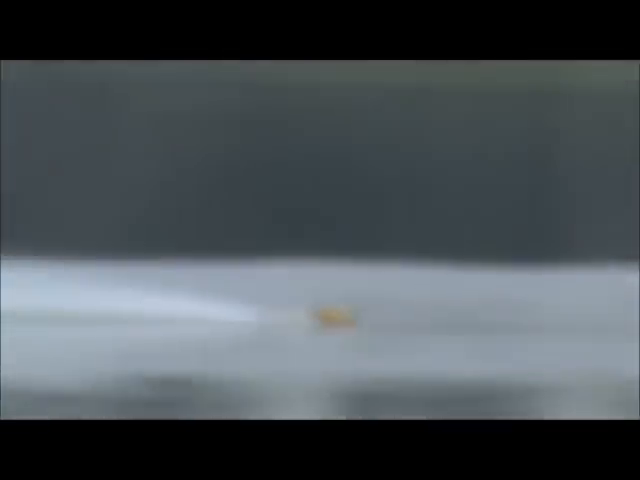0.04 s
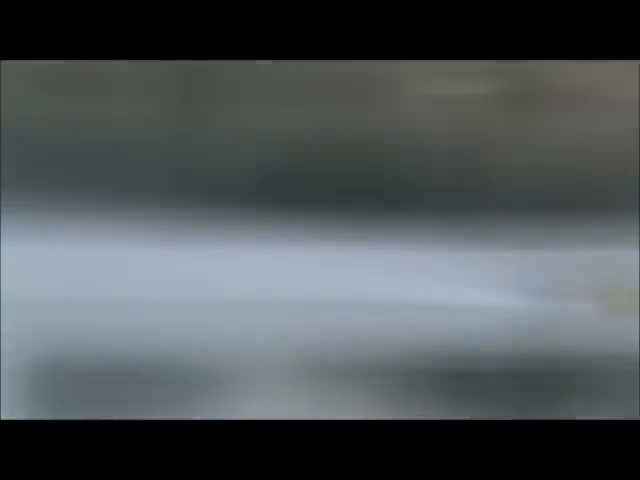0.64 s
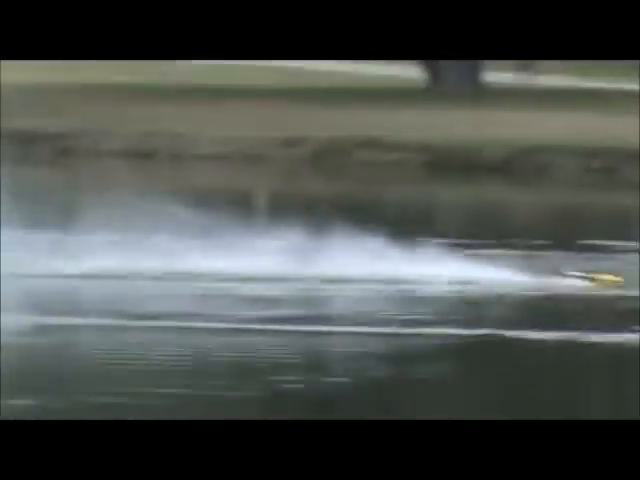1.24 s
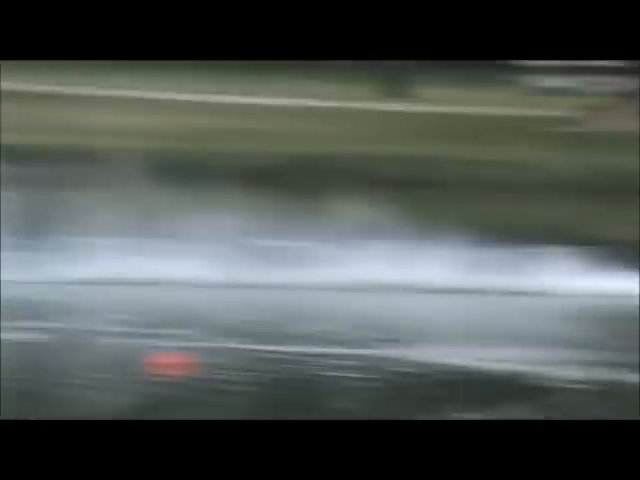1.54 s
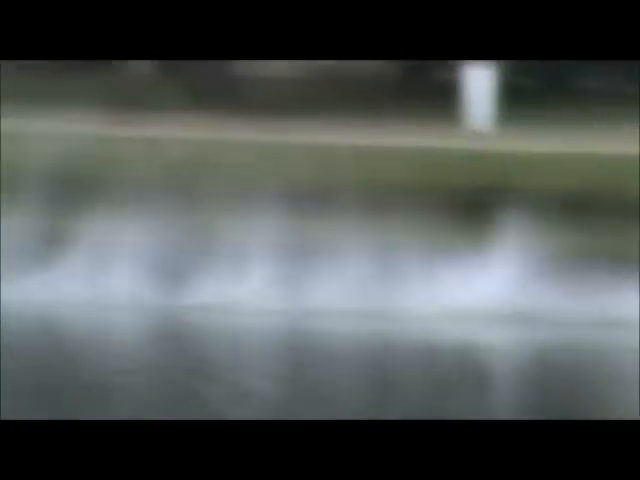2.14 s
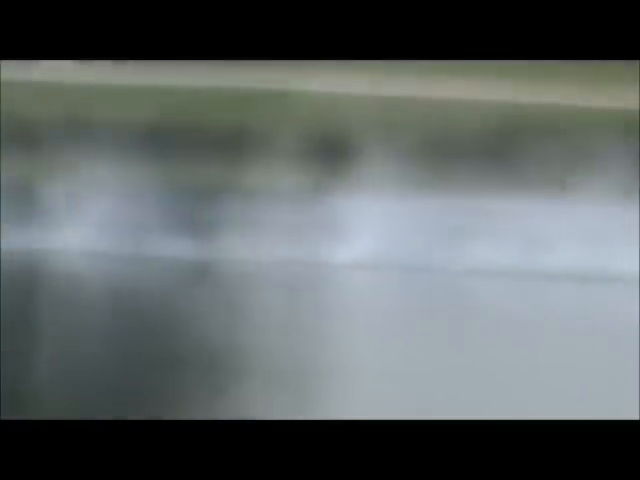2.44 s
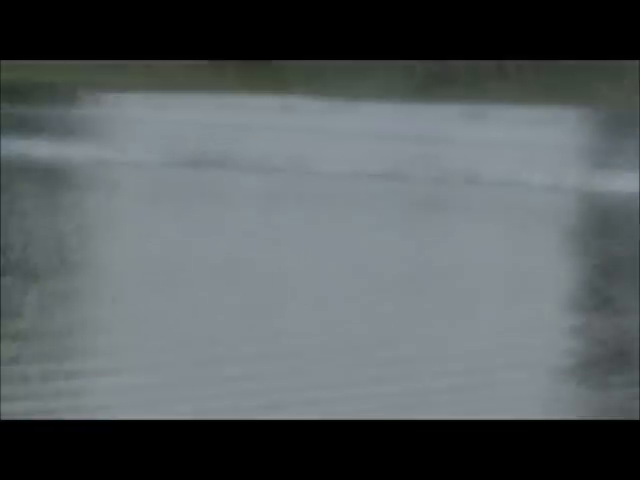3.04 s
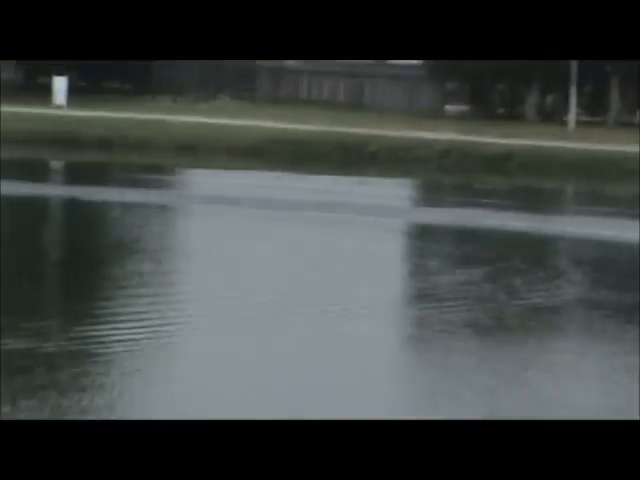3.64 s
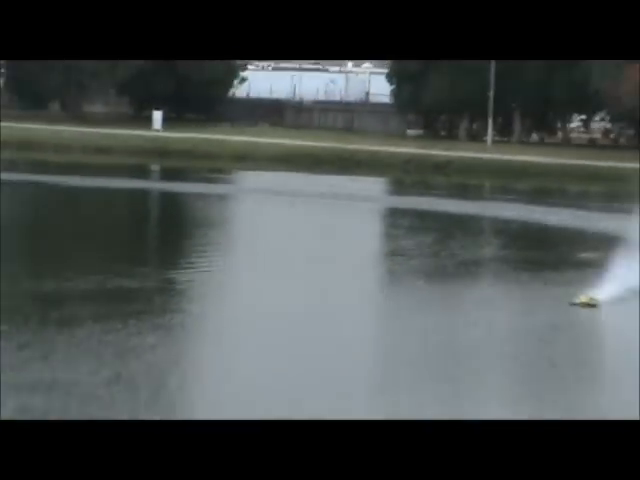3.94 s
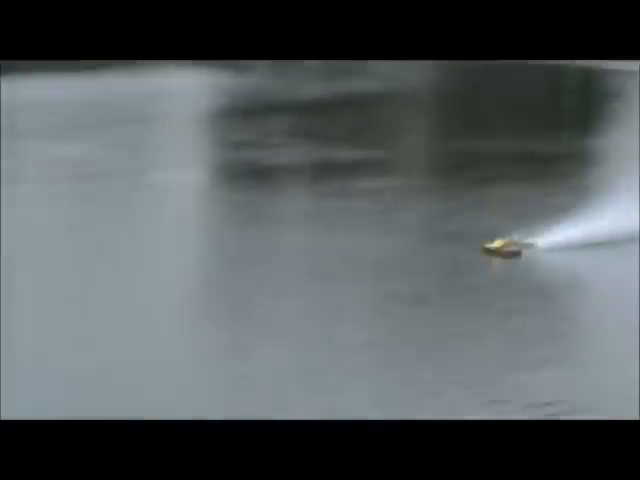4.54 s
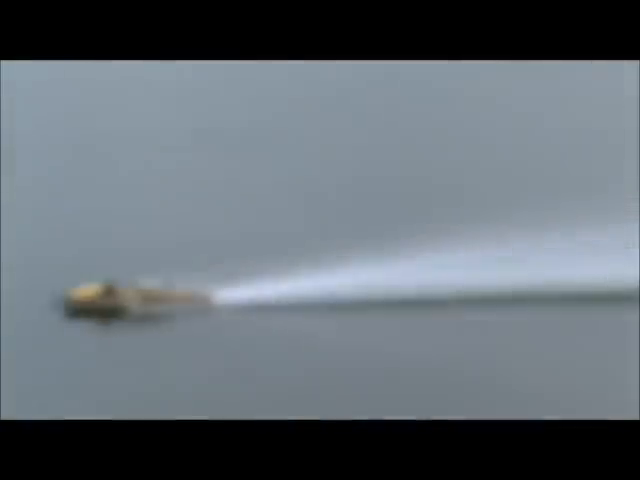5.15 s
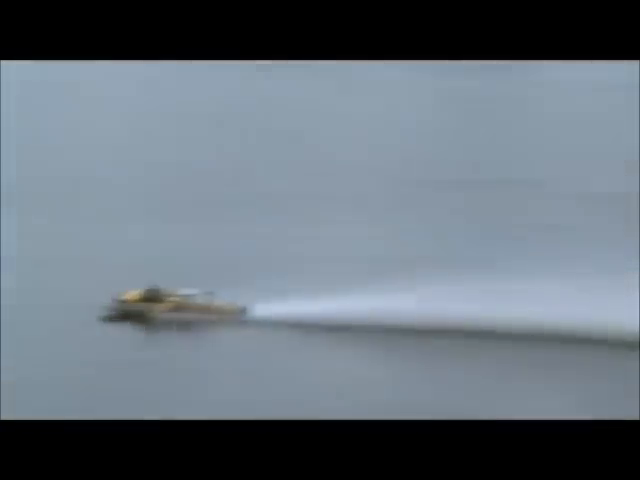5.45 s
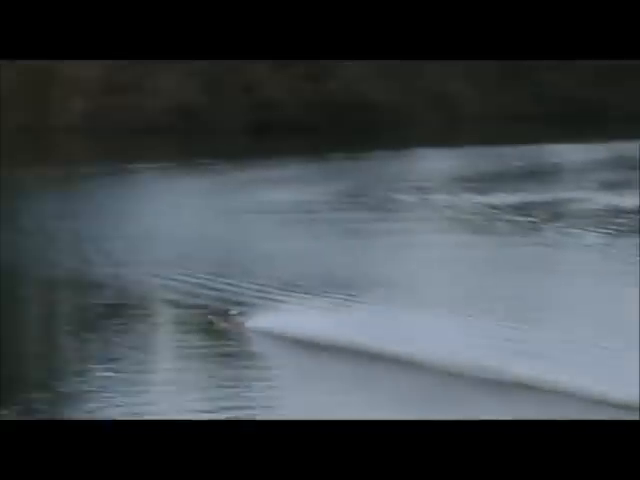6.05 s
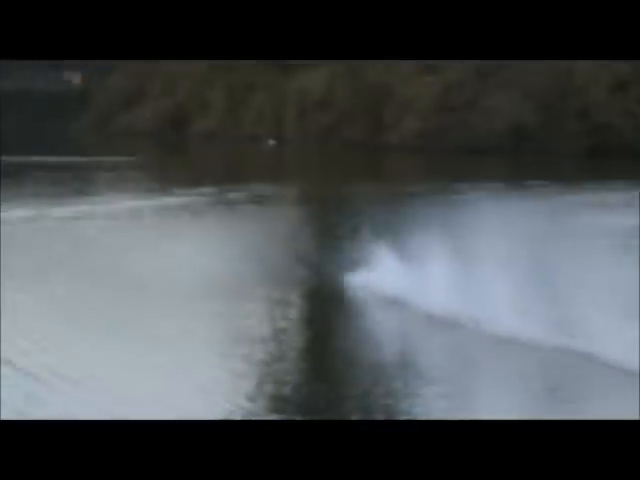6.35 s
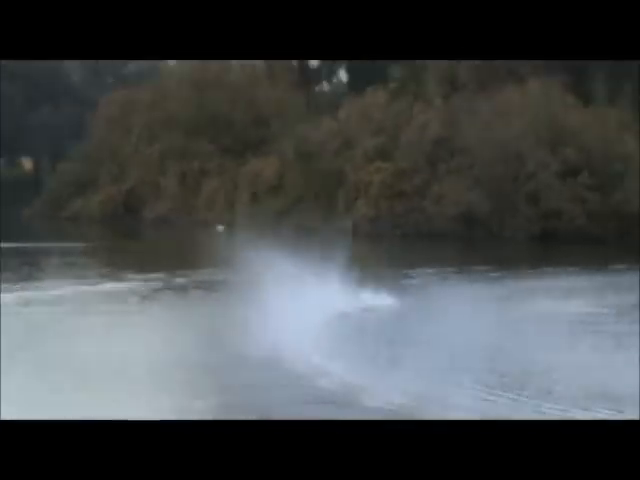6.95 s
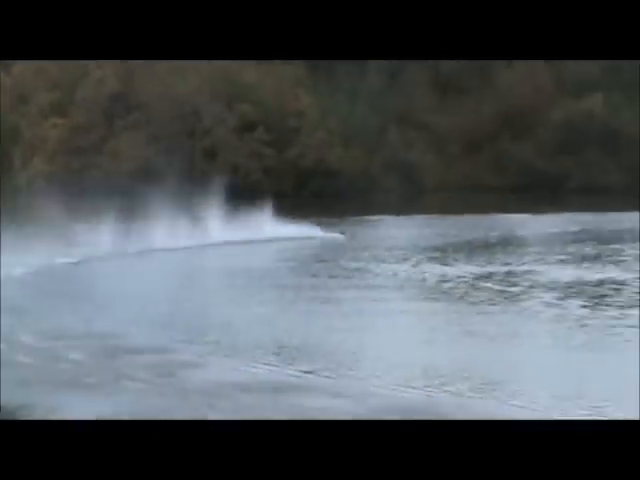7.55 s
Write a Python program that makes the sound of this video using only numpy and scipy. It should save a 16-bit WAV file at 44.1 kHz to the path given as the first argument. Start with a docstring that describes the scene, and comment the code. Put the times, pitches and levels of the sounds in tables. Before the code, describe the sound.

Heard from the edge of a pond, a small model speedboat holds a high, raspy engine scream that wavers and leaps in quick blips. The pitch climbs a little on the approach, the exhaust and spray hiss as it goes by, and the note sinks as it heads away with more quick revs. Its wake churns softly underneath, and the wooded banks return a dull echo.

```python
"""First comes the hard, singing buzz of a model racing boat's two-stroke, flat out across a pond.
Heard from the bank on a close pair of microphones, it passes near at about 5.4 s and turns away.
The hull skips on the ripples: the engine races as the propeller lifts and sags as it bites.
The tuned pipe sings the low orders, the exhaust rasps and sizzles above them, and close up the drive whines.
Behind it the wake churns, the open air rumbles and the wooded banks answer."""
import sys
import numpy as np
from scipy import signal
from scipy.fft import rfft, irfft, next_fast_len
from scipy.io import wavfile
from scipy.ndimage import uniform_filter1d, minimum_filter1d, map_coordinates

SR = 44100
rng = np.random.default_rng(int(sys.argv[2]) if len(sys.argv) > 2 else 0)


def bounce(signal):
    """Save signal as a 16-bit WAV file at the path given by the first command-line argument."""
    frames = np.transpose(np.atleast_2d(signal))
    limited = np.clip(frames, -1, 1)
    pcm = np.round(limited * 32767).astype(np.int16)
    wavfile.write(sys.argv[1], SR, pcm)


N = 343539

# firing rate with the propeller gripping: up on the approach, down in the pass and the turn: t/s, f/Hz
CRUISE_RATE = [(0.0, 309), (0.98, 303.2), (1.56, 307), (2.36, 307.4), (2.83, 311.6), (3.52, 306.2),
               (3.64, 317.5), (4.5, 332.5), (4.79, 332), (5.14, 323.4), (5.7, 287.6), (6.01, 281.4),
               (6.86, 275.5), (7.19, 277.7), (7.79, 264.5)]
# spells of even rocking: first crest/s, last crest/s, period/s, first swing/Hz, last swing/Hz
ROCKING_SPELLS = [(0.023, 0.27, 0.0814, 4.3, 6.6), (1.468, 2.03, 0.0813, 9.7, 14.4),
                  (2.665, 2.9, 0.0784, 10.2, 12.8), (3.734, 4.89, 0.0902, 6.7, 5.3),
                  (5.8977, 6.63, 0.0997, 0.4, 15.7)]
# leaps that lift the propeller clear: take-off/s, time in the air/s, pull on the firing rate/Hz
HULL_LEAPS = [(2.11, 0.05, 32), (2.209, 0.051, 57.5), (2.463, 0.056, 55), (2.585, 0.036, 31.7),
              (2.971, 0.04, 19), (3.072, 0.053, 79), (3.193, 0.08, 7.97), (3.437, 0.026, 65),
              (6.775, 0.024, 55), (6.879, 0.041, 42), (7.009, 0.068, 42), (7.153, 0.099, 54),
              (7.326, 0.101, 55.6), (7.497, 0.087, 54), (7.656, 0.049, 50)]
# resonances of the tuned pipe: f/Hz, level/dB
PIPE_RESONANCES = [(240, -9.5), (290, -10), (340, -8.5), (500, -13.5), (580, -4.5), (655, 1), (760, -1.5),
                   (900, -9.5), (1100, -0.5), (1240, -6), (1350, -9.5), (1480, -18)]
# the pipe's first four orders as heading and distance change: t/s, relative level/dB
ORDER_1 = [(0.0, -14.5), (0.89, -15), (1.06, -10), (1.32, -14.3), (2.06, -10.5), (2.23, -17), (3.57, -13),
           (3.89, -18.5), (4.24, -14.5), (4.65, -17), (5.69, -7), (6.16, -14), (6.9, -14), (7.55, -21),
           (7.79, -17)]
ORDER_2 = [(0.0, -11.5), (0.36, -17.5), (2.15, -11.5), (2.59, -15), (3.21, -11.5), (3.32, -9),
           (4.24, -10.5), (4.56, -14.5), (5.15, -12.5), (5.29, -19.5), (5.76, -14), (5.88, -22.5),
           (7.08, -18.5), (7.4, -11), (7.79, -14.0)]
ORDER_3 = [(0.0, -13.4), (0.92, -14.4), (1.0, -20.5), (1.11, -13), (3.17, -14.5), (3.28, -11.5),
           (5.25, -15.0), (5.54, -11), (6.1, -18.5), (6.42, -17), (7.01, -20.5), (7.21, -14.6), (7.79, -14)]
ORDER_4 = [(0.0, -9.5), (2.33, -13.5), (2.89, -9), (3.15, -18), (3.71, -11.5), (4.09, -14), (4.68, -10),
           (5.09, -15.5), (5.29, -8), (5.4, -29.5), (5.48, -10), (5.74, -21.8), (5.88, -18.5),
           (6.14, -19.5), (6.36, -14.5), (7.37, -21.5), (7.79, -16)]
# roughness of the ride, which sets the exhaust's share of turbulent gas and spray: t/s, share/0-1
ROUGHNESS = [(0, 0.18), (.5, 0.08), (1.35, 0.1), (1.6, 0.28), (3.3, 0.42), (4.6, 0.38), (5.4, 0.33),
             (5.8, 0.11), (6.5, 0.07), (6.75, 0.32), (7.1, 0.18), (7.79, 0.22)]
# the rasp, strongest with the boat pointing at the shore or away from it: t/s, relative level/dB
RASP_LEVEL = [(0.0, -19), (0.45, -16.5), (0.8, -14.5), (0.95, -12.5), (1.35, -19), (1.6, -22), (2.25, -22),
              (2.85, -19), (3.1, -19), (3.25, -21.5), (4.1, -23), (4.55, -18.7), (5.55, -21), (6.1, -12),
              (6.4, -15.5), (6.78, -30), (7.25, -20), (7.79, -23)]
# the exhaust's two top bands, strongest close to the microphones: t/s, edge/dB, sizzle/dB (both relative)
TOP_LEVELS = [(0.0, -26, -44.5), (0.42, -29, -44), (0.65, -34, -50), (1.15, -28.5, -44),
              (1.75, -33.1, -50.5), (2.6, -30.5, -46.5), (3.1, -29.5, -43.5), (3.9, -32.0, -42),
              (4.5, -28.9, -34), (5.2, -28.5, -28.2), (5.38, -22, -21.5), (5.56, -25, -25),
              (5.75, -24, -23), (6.15, -29.5, -26), (6.75, -33.8, -42.5), (7.15, -37, -43.5),
              (7.55, -33.5, -44.5), (7.79, -29.5, -46.5)]
# colour of the exhaust from ahead, abeam and astern: f/Hz, level/dB
FROM_AHEAD = [(1250, -59), (1520, -23), (1830, -8.5), (2130, -1.5), (2440, -0.5), (2750, -11), (3050, -9.5),
              (3350, -16), (3660, -4), (3950, -16.5), (4550, -5), (4900, -16.5), (5800, -18), (7000, -29.5)]
FROM_ABEAM = [(1250, -41), (1550, -5.5), (1950, 1.5), (2300, -4), (2650, 0.5), (2950, -5.5), (3350, -2.5),
              (3950, -9), (4700, -6), (5600, -8.5), (7000, -20.5)]
FROM_ASTERN = [(1150, -60), (1400, -12), (1700, -1), (2000, 3.5), (2280, 4), (2550, -1), (2850, -2),
               (3150, -14), (3450, -9.5), (3900, -21.5), (5600, -22), (7000, -35)]
# colour of the exhaust's top band: f/Hz, level/dB
SIZZLE_COLOUR = [(5500, -19), (6900, -7.5), (8400, 2), (9600, -3), (10800, -12), (11800, -30.5),
                 (14000, -47)]
# spray hiss, which carries only a short distance: f/Hz, level/dB
SPRAY_COLOUR = [(8000, -33), (10500, 2.5), (12000, -8.5), (15000, -21), (16500, -56)]
# how squarely the spray stands between pipe and shore: t/s, share/0-1
SPRAY_SCREEN = [(5.7, .2), (6.1, 0.99), (6.6, 0.76), (7.0, .25)]
# echo of the wooded banks: f/Hz, time to fall 60 dB/s
BANK_DECAY = [(200, 1), (1000, 0.62), (3000, 1), (10000, 0.15)]
# churning water behind the hull, and the rumble of the open air: f/Hz, level/dB
WASH_COLOUR = [(100, -54), (250, -2), (420, -8), (650, 1), (1150, 2), (1450, -3), (1900, -1), (3000, -66)]
AIR_COLOUR = [(15, -19), (30, -6.5), (50, -3.5), (75, 3.5), (110, -0.5), (190, 0), (300, -42), (600, -32),
              (2000, -77)]
# the background at the water's edge: t/s, wash level/dB, air level/dB
BACKGROUND_LEVELS = [(0, -27.5, -41), (1.3, -27, -41), (2, -25, -39), (3.3, -24.5, -38.5),
                     (4.5, -27.5, -45), (5.5, -24.5, -49), (6.3, -28.5, -51.5), (6.9, -32, -47),
                     (7.79, -29, -44.5)]
# the boat drifts a little to either side of the microphones: t/s, left minus right/dB
BOAT_BEARING = [(0, 0.4), (1.2, -0.2), (2.5, -1), (3.5, -2), (4.7, -2), (5.5, -1), (6.5, 0.1), (7.79, 0.5)]
# colour of one capsule against the other: f/Hz, left minus right/dB
CAPSULE_BALANCE = [(60, 4), (170, 7), (300, 4.5), (640, 3.5), (1150, -0.4), (2300, -1.5), (4500, 0),
                   (9000, 0), (13000, -4.5)]
# stereo width of the pair: f/Hz, typical side minus mid/dB
PAIR_WIDTH = [(60, -13), (300, -20), (1200, -15), (4000, -15), (9000, -12), (13000, -5)]


def amp(db):
    """Decibels to gain."""
    return np.exp(np.asarray(db) * np.log(10) / 20)


def unit(x):
    """x at rms 1."""
    return x / np.sqrt(np.mean(x ** 2) + 1e-20)


def along(points, hz):
    """Read (f/Hz, value) points on a log axis."""
    f, v = np.transpose(points)
    return np.interp(np.log(hz + 1), np.log(f + 1), v)


def curves(rows):
    """One value per sample for each column after the time."""
    times, *columns = np.transpose(rows)
    return [np.interp(np.arange(N) / SR, times, column) for column in columns]


def wobble(rate):
    """A smooth random curve, rate knots a second."""
    knots = int(N * rate / SR) + 4
    fine = np.arange(knots * 8) / 8
    smooth = map_coordinates(rng.standard_normal(knots + 1), [fine])
    return np.interp(np.arange(N) * rate / SR, fine, smooth)


def filtered(x, response):
    """x through a complex frequency response."""
    m = next_fast_len(N + SR // 2)
    return irfft(rfft(x, m) * response(np.fft.rfftfreq(m, 1 / SR)), m)[..., :N]


def coloured(x, spectrum):
    """x shaped by a spectrum, at rms 1."""
    return unit(filtered(x, lambda hz: amp(along(spectrum, hz))))


def firing_rate(wander_hz=0.8, flutter=0.00314):
    """Hull motion, slow drift and chop ride on the cruising revs; combustion makes them flutter."""
    wander = wander_hz * wobble(8)
    chop = 4 * curves(ROUGHNESS)[0] * wobble(22)
    return (curves(CRUISE_RATE)[0] + hull_motion() + wander + chop) * (1 + flutter * wobble(45))


def hull_motion(spin_up_s=0.0136, bite_s=0.0108, sag_delay_s=0.041, sag_width_s=0.029):
    """Hz that the engine gains and loses as the hull rocks, leaps, and digs in before and after a leap."""
    t = np.arange(N) / SR
    swing = np.zeros(N)
    for first, last, period, first_hz, last_hz in ROCKING_SPELLS:
        depth = np.interp(t, [first - period / 2, first, last, last + period / 2], [0, first_hz, last_hz, 0])
        swing += depth * np.cos(2 * np.pi * (t - first) / period)
    for start, length, race_hz in HULL_LEAPS:
        age = t - start
        airborne = (1 + np.tanh(age / spin_up_s)) * (1 - np.tanh((age - length) / bite_s)) / 4
        take_off_sag = 0.44 * np.exp(-(age / sag_width_s) ** 2)
        landing_sag = 0.36 * np.exp(-((age - length - sag_delay_s) / sag_width_s) ** 2)
        swing += race_hz * (airborne - take_off_sag - landing_sag)
    return swing


def pipe_note(rate, crank, fading_db=0.48, shimmer_db=1.0, grit_db=0.61, lag_rad=0.571):
    """The low orders swell through the pipe's resonances, and fade and shimmer over the rippled water."""
    note = np.zeros(N)
    for k, strength in enumerate((ORDER_1, ORDER_2, ORDER_3, ORDER_4), 1):
        level_db = curves(strength)[0] + along(PIPE_RESONANCES, k * rate)
        level_db += fading_db * wobble(11) + shimmer_db * wobble(35)
        phase = k * crank - lag_rad * k * k  # higher orders leave the pipe later
        note += amp(level_db) * np.sqrt(2) * np.cos(phase)
    return note * amp(grit_db * wobble(260))  # no two firings are equally strong


def exhaust(rate, crank, wake_hiss=0.25, flicker_db=1.5, sway_db=0.5):
    """Each opening of the port sends out a buzz and a puff of gas, in three bands topped by spray hiss."""
    rough, = curves(ROUGHNESS)
    tone = buzz(crank, rough) * amp(1.4 * wobble(280))
    puffs = rng.standard_normal(N) * (1 + 0.83 * np.cos(crank))
    top_share = rough + wake_hiss  # the rooster tail turns more of the highest orders to hiss

    def mix(share, puff_db, buzz_db=0):
        """Buzz with a share of turbulence."""
        return amp(buzz_db) * np.sqrt(1 - share) * tone + amp(puff_db) * np.sqrt(share) * puffs

    rasp_db, = curves(RASP_LEVEL)
    edge_db, sizzle_db = curves(TOP_LEVELS)
    rasp = band_from_shore(mix(rough, puff_db=1, buzz_db=snarl(rate)), low_hz=1150, high_hz=3700)
    rasp *= amp(rasp_db + 0.8 * wobble(30))
    edge = band_from_shore(mix(top_share, puff_db=2), low_hz=3660, high_hz=7180)
    edge *= amp(edge_db + flicker_db * wobble(55))
    sizzle = coloured(mix(top_share, puff_db=0.5), SIZZLE_COLOUR)
    sizzle *= amp(sizzle_db + flicker_db * wobble(40))
    spray = coloured(rng.standard_normal(N), SPRAY_COLOUR)
    spray *= amp(1.455 * sizzle_db + 1.5)  # air absorbs it faster with distance
    return (rasp + edge + sizzle + spray) * amp(sway_db * wobble(11))  # the pipe sways with the hull


def buzz(crank, rough, drift_rad=0.43):
    """Upper exhaust orders; the rougher the ride, the more the reflection off the water shifts each one."""
    total = np.zeros(N)
    fading_db = 5.5 * np.sqrt(rough)
    for k in range(5, 40):
        phase = k * crank + rng.uniform(0, 2 * np.pi) + drift_rad * wobble(9)
        total += amp(fading_db * wobble(12)) * np.cos(phase)
    return unit(total)


def snarl(rate, lead_s=0.0053, bark_db_per_hz=0.055, bark_delay_s=0.016, bark_width_s=0.019):
    """dB by which the rasp opens as the engine races, barks at take-off and chokes behind the spray."""
    t = np.arange(N) / SR
    overspeed = rate / uniform_filter1d(rate, SR // 4) - 1
    racing = np.tanh(np.interp(t + lead_s, t, overspeed) / 0.032)  # opens just before the revs peak
    bark = sum(bark_db_per_hz * race_hz / (1 + ((t - start - bark_delay_s) / bark_width_s) ** 2) ** 2
               for start, _, race_hz in HULL_LEAPS)
    choke = 7 * curves(SPRAY_SCREEN)[0] * np.minimum(racing, 0) ** 2  # whenever the stern squats
    return 0.93 * racing + bark - choke


def band_from_shore(x, low_hz, high_hz):
    """One band of the exhaust, coloured by the side that the boat shows to the microphones."""
    heading = np.interp(np.arange(N) / SR, [1.35, 1.6, 5.3, 5.75], [0.072, 0.47, 1.3, 2])
    band = filtered(x, lambda hz: 1 / (1 + (low_hz / (hz + 1)) ** 20) / (1 + (hz / high_hz) ** 20))
    views = [(0, FROM_AHEAD), (1, FROM_ABEAM), (2, FROM_ASTERN)]
    return sum(np.clip(1 - abs(heading - side), 0, 1) * coloured(band, view) for side, view in views)


def drive_whine(crank, pass_s=5.35, fade_db_per_s=63, wander_rad=0.46):
    """Two fuzzy tones locked to the shaft speed, which carry only around the closest point."""
    distance_db = -fade_db_per_s * abs(np.arange(N) / SR - pass_s)
    partials = [(15.5, -24), (35, -31)]  # multiple of the firing rate, level/dB
    return sum(amp(db + distance_db) * np.sqrt(2) * np.cos(k * crank + wander_rad * wobble(200))
               for k, db in partials)


def bank_echo(x, delay_s=0.05):
    """The far banks and trees return a diffuse, dull echo."""
    hz, t, spectrum = signal.stft(rng.standard_normal(SR), SR, nperseg=256)
    decay = amp(-60 * t / along(BANK_DECAY, hz)[:, None])
    _, tail = signal.istft(spectrum * decay, SR, nperseg=256)
    delayed = np.pad(x, (int(delay_s * SR), 0))
    return signal.fftconvolve(delayed, tail / np.linalg.norm(tail))[:N]


def shore_echo(x, delay_s=0.19, dull_hz=3000):
    """The near shore throws back one distinct, duller copy of the engine, stronger in the turn."""
    strength, = curves([(6.3, 0.2), (7.2, 0.79)])
    return strength * filtered(x, lambda hz: np.exp(-2j * np.pi * hz * delay_s) / (1 + (hz / dull_hz) ** 4))


def water_and_air():
    """The wake churns out on the pond under a soft outdoor rumble."""
    wash_db, air_db = curves(BACKGROUND_LEVELS)
    wash = amp(wash_db + 2.1 * wobble(10)) * coloured(rng.standard_normal(N), WASH_COLOUR)
    air = amp(air_db + 0.66 * wobble(5.4)) * coloured(rng.standard_normal(N), AIR_COLOUR)
    return wash + air


def microphones(x):
    """Two close capsules hear nearly the same sound, each in its own colour; their phases wander apart."""
    side = filtered(x, lambda hz: 1j * amp(along(PAIR_WIDTH, hz))) * wobble(2.8)
    pair = np.array([x + side, x - side]) * amp(np.outer([0.5, -0.5], curves(BOAT_BEARING)[0]))
    return filtered(pair, lambda hz: amp(np.outer([0.5, -0.5], along(CAPSULE_BALANCE, hz))))


def scene():
    """The pond from the bank: one crankshaft drives pipe, exhaust and whine, with echoes and water behind."""
    rate = firing_rate()
    ignition_scatter = 0.011 * wobble(240)
    crank = 2 * np.pi * np.cumsum(rate) / SR + ignition_scatter
    boat = amp(0.14) * pipe_note(rate, crank) + amp(-0.5) * exhaust(rate, crank) + drive_whine(crank)
    echoes = amp(-14) * bank_echo(boat) + amp(-16) * shore_echo(boat)
    return microphones(boat + echoes + water_and_air())


def record(dry):
    """A limiter after the microphones ducks the highest peaks; nothing passes above the band limit."""
    ceiling, top_hz = 0.94, 15650
    needed = np.minimum(1, ceiling / (abs(dry).max(axis=0) + 1e-9))
    gain = uniform_filter1d(minimum_filter1d(needed, size=300), size=150)
    return filtered(dry * gain, lambda hz: hz < top_hz)


dry = scene()
out = record(dry)
bounce(out)
```